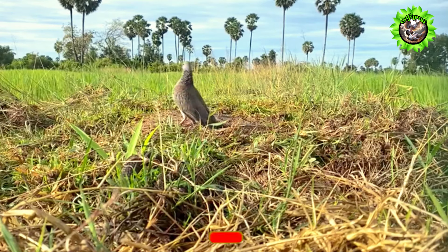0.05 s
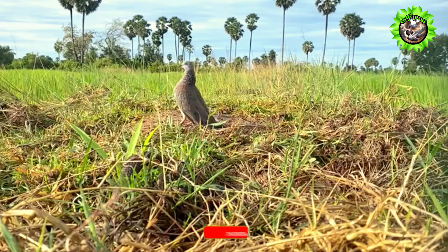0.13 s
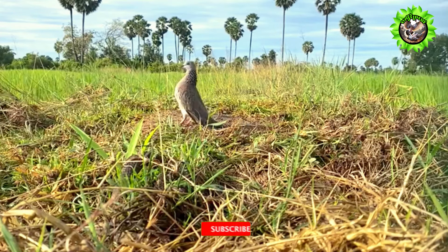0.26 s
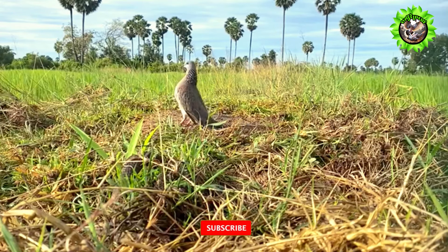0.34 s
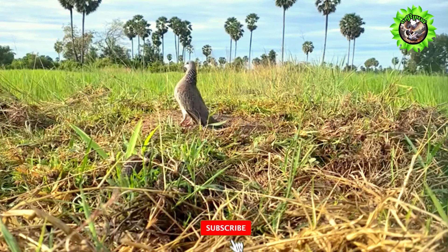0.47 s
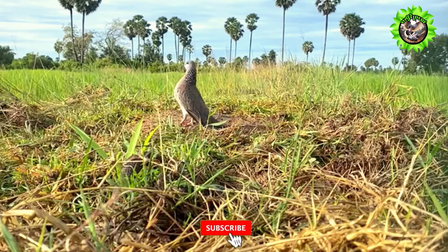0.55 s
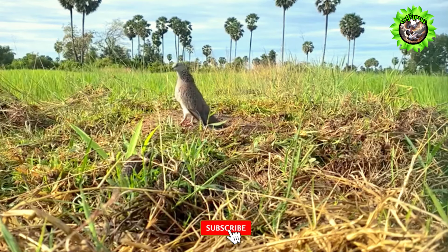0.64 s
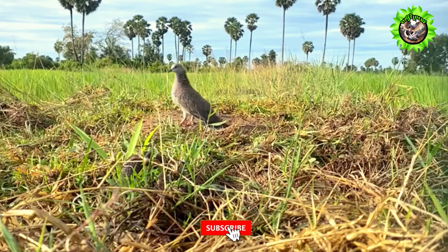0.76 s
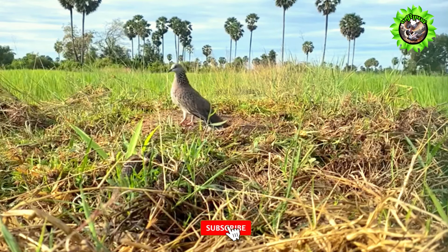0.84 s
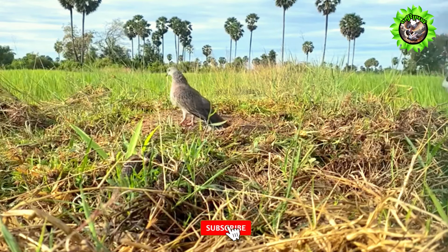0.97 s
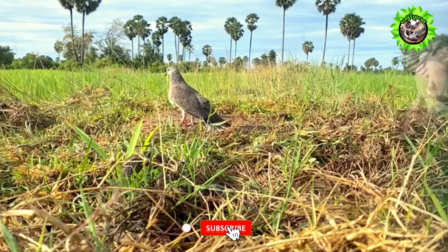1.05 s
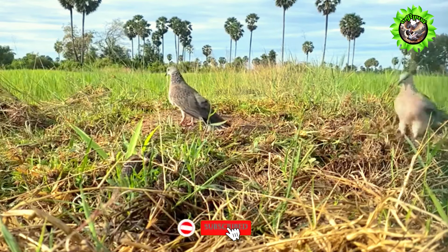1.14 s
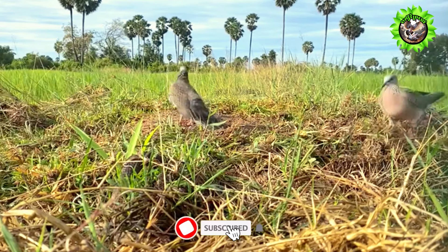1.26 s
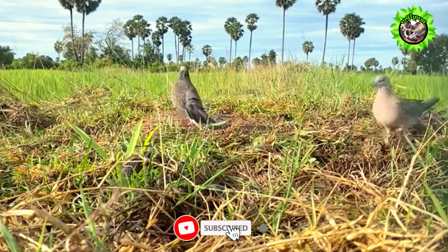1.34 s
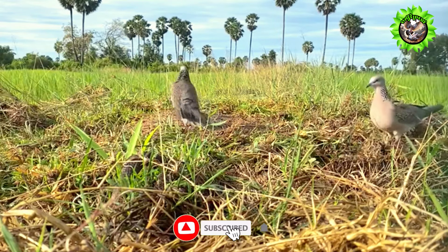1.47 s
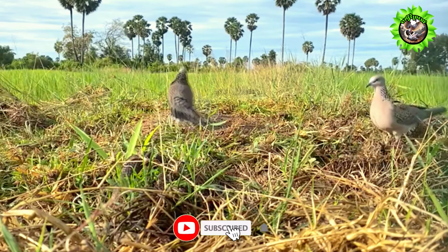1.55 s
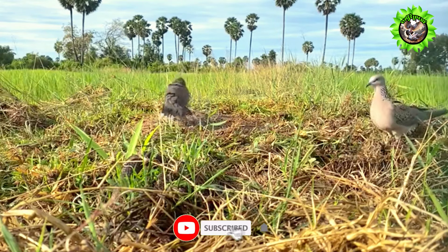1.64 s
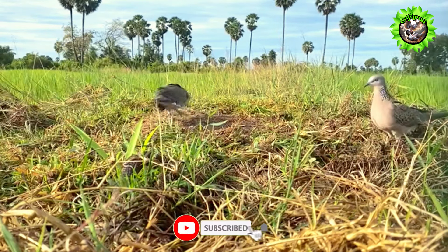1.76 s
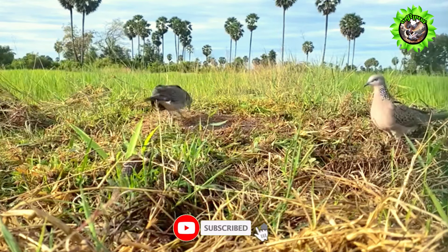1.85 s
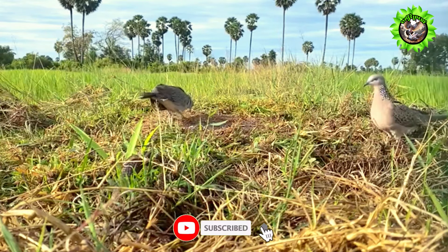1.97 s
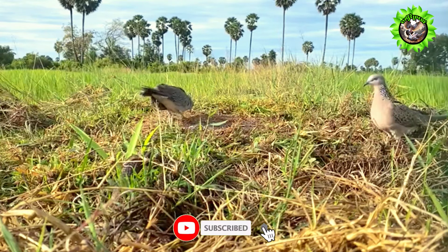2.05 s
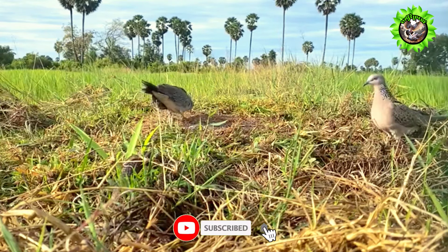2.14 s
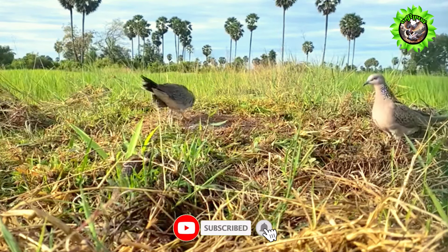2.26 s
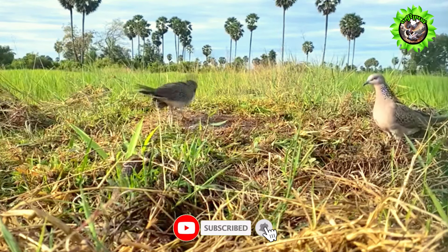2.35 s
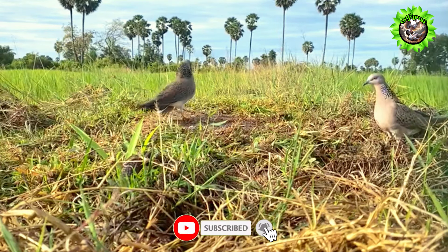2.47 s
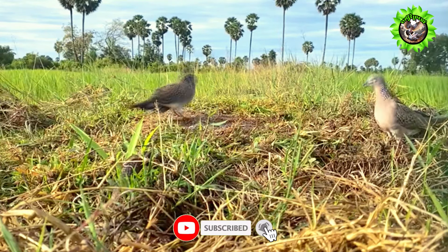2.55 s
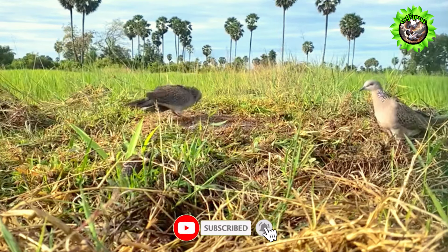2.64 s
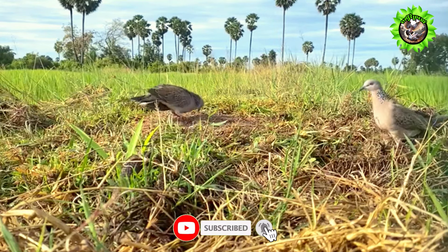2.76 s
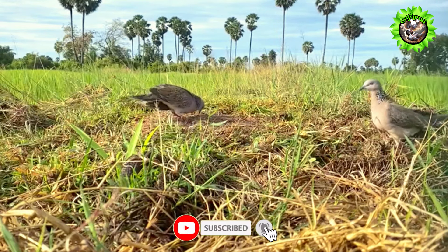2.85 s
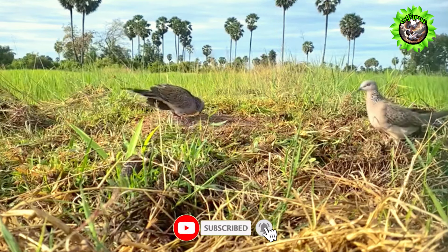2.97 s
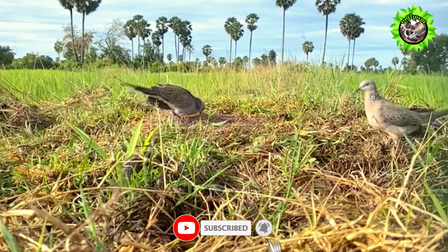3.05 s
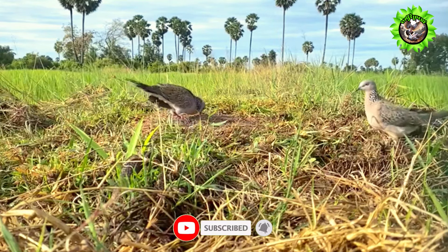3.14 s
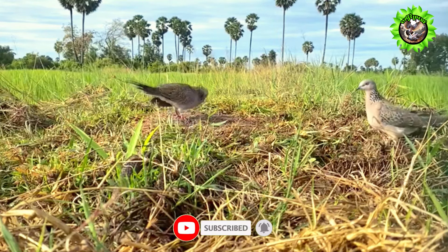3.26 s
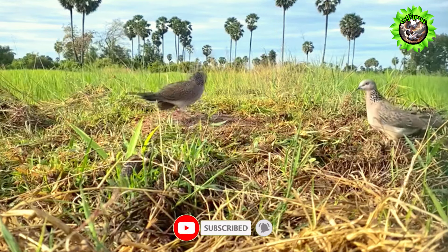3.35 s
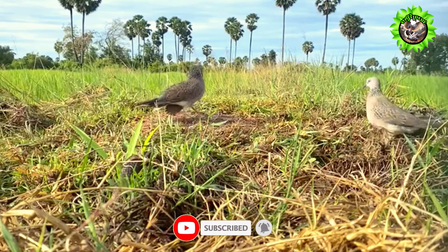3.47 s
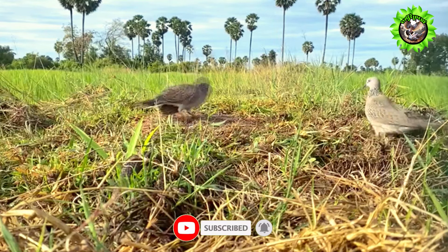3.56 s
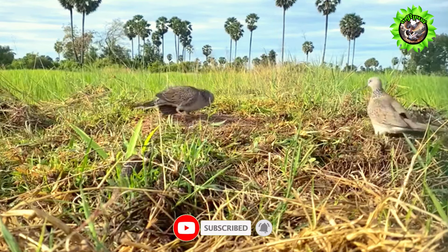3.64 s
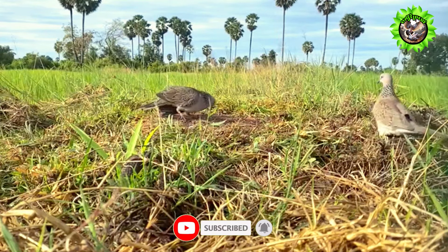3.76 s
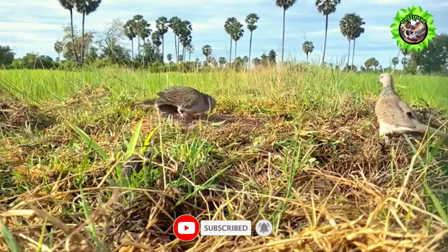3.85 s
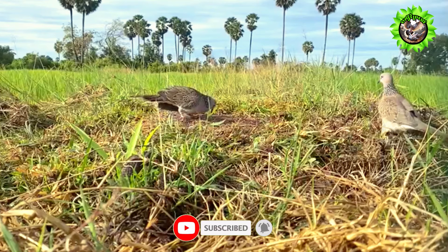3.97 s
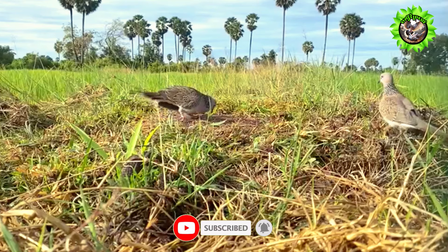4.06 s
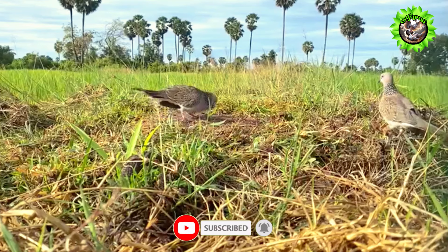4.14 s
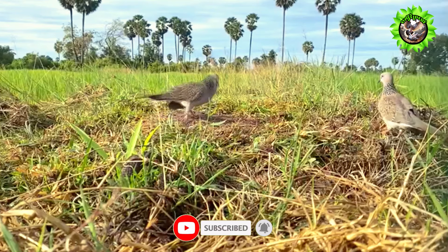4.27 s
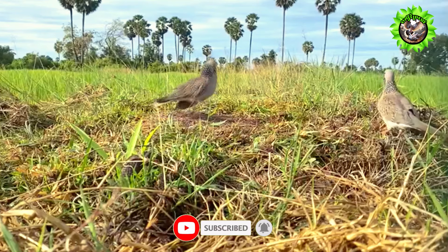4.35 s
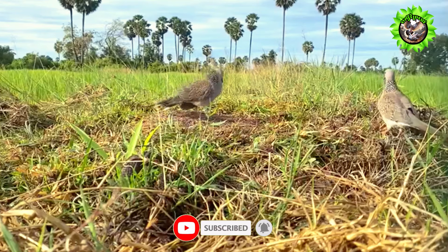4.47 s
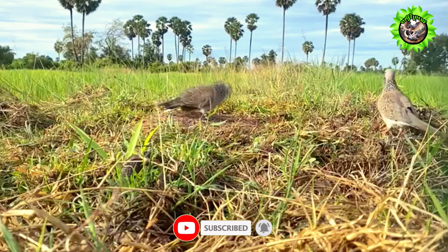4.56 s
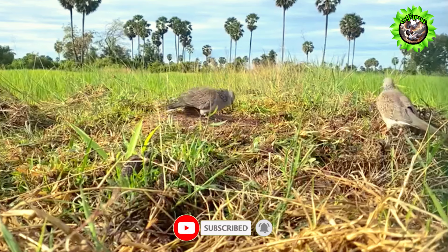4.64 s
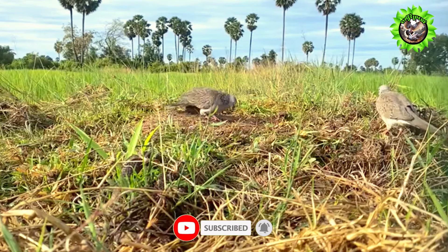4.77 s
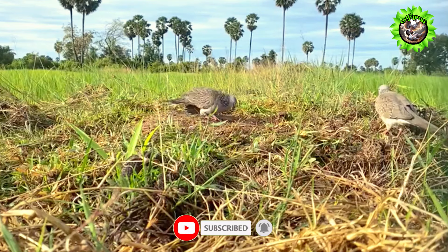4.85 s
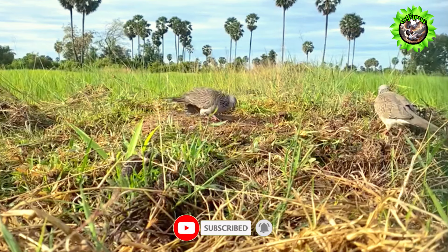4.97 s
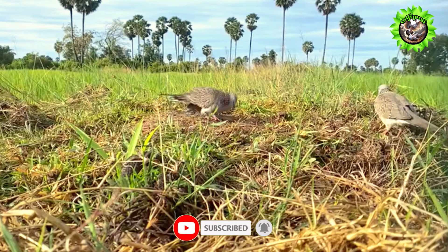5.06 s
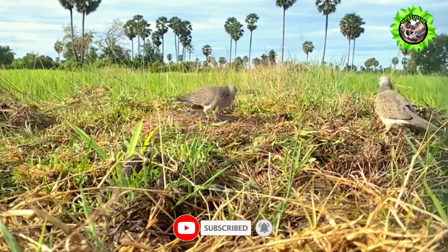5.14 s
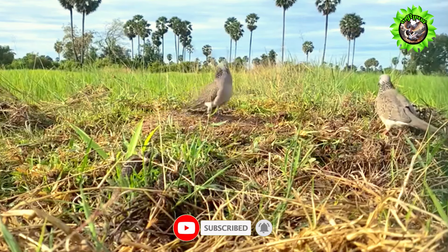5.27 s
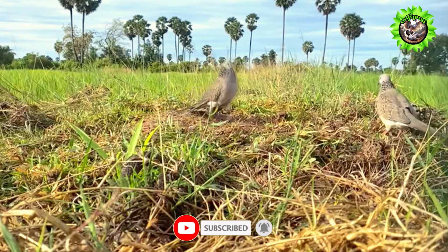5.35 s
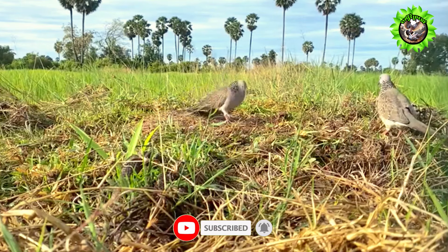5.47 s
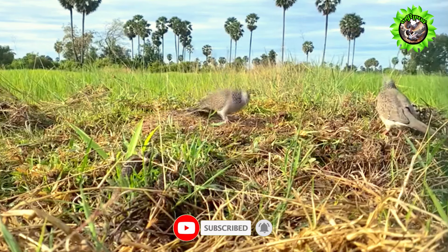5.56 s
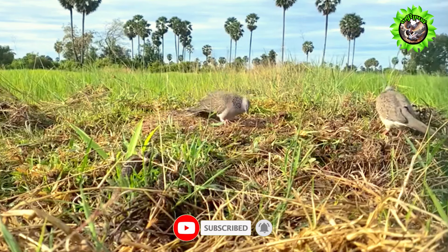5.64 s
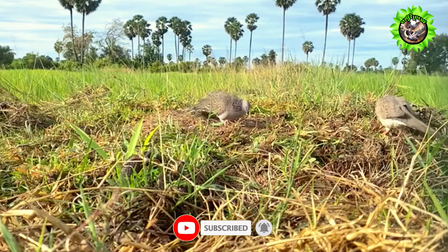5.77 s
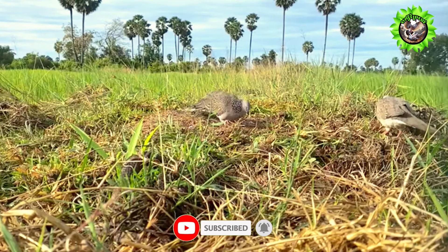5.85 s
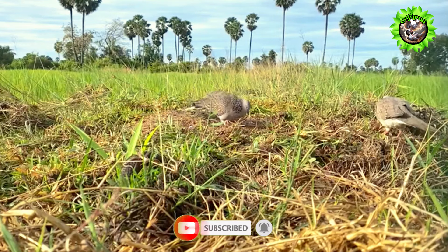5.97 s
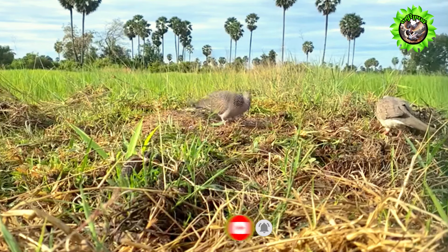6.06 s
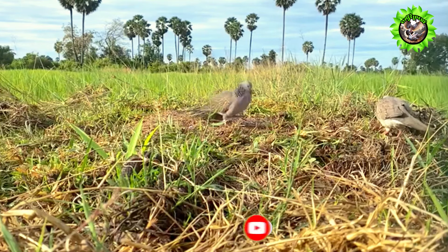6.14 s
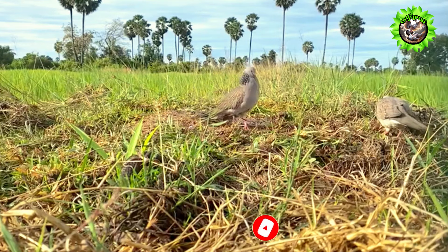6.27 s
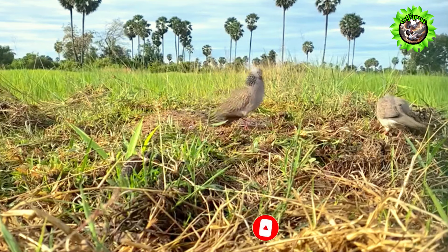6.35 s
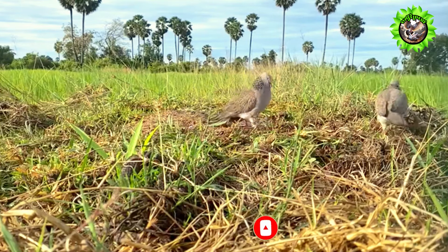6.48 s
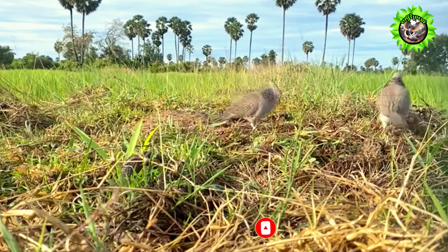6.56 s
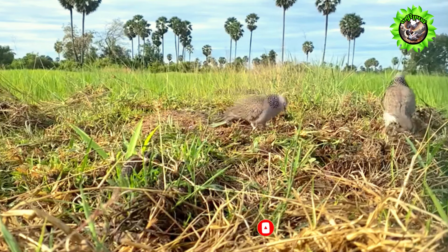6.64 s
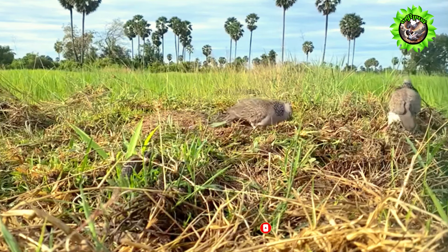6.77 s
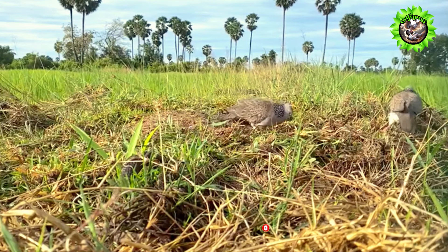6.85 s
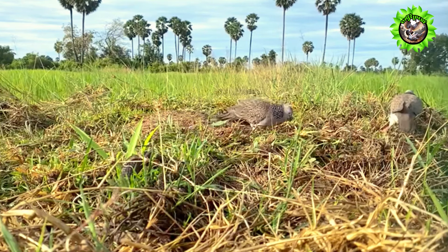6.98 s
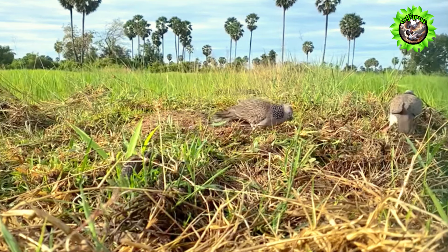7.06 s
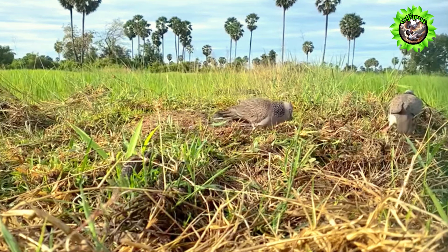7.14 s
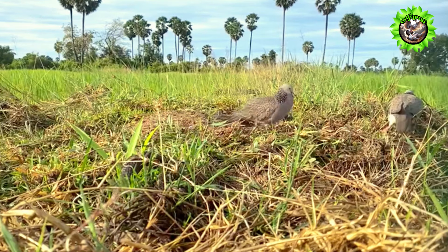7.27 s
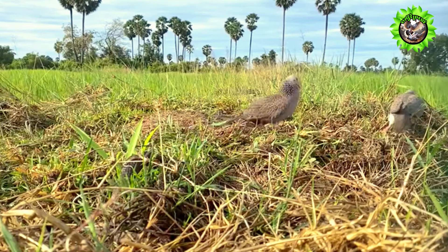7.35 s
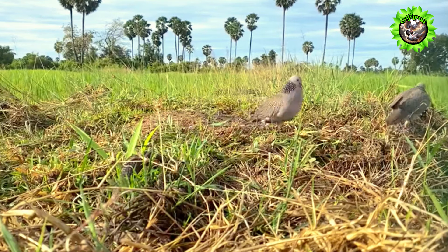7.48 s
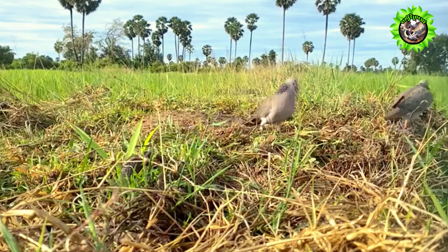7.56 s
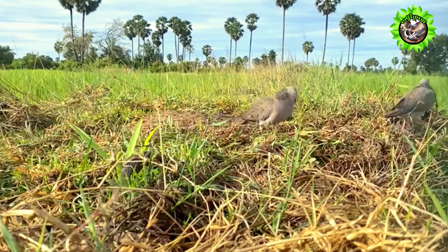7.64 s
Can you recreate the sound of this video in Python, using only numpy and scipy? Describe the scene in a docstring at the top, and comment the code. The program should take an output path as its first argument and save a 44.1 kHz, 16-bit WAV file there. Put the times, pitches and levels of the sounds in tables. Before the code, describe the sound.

Wings flap in with dry rustling, then a nearby dove repeats purring two-note coos; faint high whistles, an insect trill and a farther, rougher dove join.

```python
"""A dove close by coos in pairs, a short purred note and a long one that clears and drops; another answers farther off.
Each coo is a nearly pure tone made to throb by a slower flutter. Small birds whistle in gliding pure tones,
an insect trills in rapid strokes, and a dove flies in with claps and swishes of noise.
Short noise bursts tick, two of them like a faint chirp; dry stalks rustle in noise and crackles,
and shaped noise makes the wind and the rumble under the open field."""
import sys
import numpy as np
from scipy import signal
from scipy.fft import rfft, irfft
from scipy.io import wavfile
from scipy.ndimage import uniform_filter1d

SR = 44100
rng = np.random.default_rng(int(sys.argv[2]) if len(sys.argv) > 2 else 0)


def int16_out(signal):
    """Quantize to a 16-bit WAV file."""
    q = np.round(np.clip(np.atleast_2d(signal).T, -1, 1) * 32767)
    wavfile.write(sys.argv[1], SR, q.astype(np.int16))


N = 340011   # length of the scene in samples


def from_db(db):
    """Decibels to gain."""
    return 10 ** (np.asarray(db) / 20)


def rms_one(x):
    """Scale to rms 1."""
    return x / np.sqrt(np.mean(x ** 2) + 1e-20)


def stretch(rows):
    """Sample indices from the first row's time to the last, and each other column read along them."""
    s, *columns = np.transpose(rows)
    at = np.arange(max(round(s[0] * SR), 0), min(round(s[-1] * SR), N))
    return at, [np.interp(at / SR, s, column) for column in columns]


def drift(rate_hz):
    """Random wandering of rms 1: noise sent twice through a simple low-pass."""
    r = np.exp(-2 * np.pi * rate_hz / SR)
    noise = rng.standard_normal(N + SR)
    return rms_one(signal.lfilter([1], [1, -2 * r, r * r], noise)[SR:])   # skip the filter's start


def turns(hz):
    """Phase in radians of a changing frequency."""
    return 2 * np.pi * np.cumsum(hz) / SR


def delayed(x, delay_s):
    """The same sound, later."""
    return np.r_[np.zeros(round(delay_s * SR)), x][:N]


def band(order, low_hz, high_hz, x):
    """Keep only the sound between two pitches."""
    return signal.sosfilt(signal.butter(order, [low_hz, high_hz], "band", fs=SR, output="sos"), x)


def coloured(spectrum, flicker_db, flicker_hz):
    """Noise whose level flickers, shaped by a table of pitch and level; rms 1."""
    hz, level_db = np.transpose(spectrum)
    grid = np.maximum(np.arange(N // 2 + 1) * SR / N, 1)
    shape = from_db(np.interp(np.log(grid), np.log(hz), level_db, left=-90, right=-90))
    noise = rng.standard_normal(N) * from_db(flicker_db * drift(flicker_hz))
    return rms_one(irfft(rfft(noise) * shape, N))


def burst(s, db, rise_s, low_hz, high_hz):
    """A puff of noise that rises and dies away, then is narrowed to a band."""
    t = np.arange(round(12 * rise_s * SR) + 400) / SR / rise_s   # in rise times
    puff = from_db(db) * rng.standard_normal(len(t)) * t * np.exp(1 - t)
    out, first = np.zeros(N), round(s * SR)
    out[first:][:len(t)] = band(3, low_hz, high_hz, puff)[:N - first]
    return out


ATTACK_S, RELEASE_S = 0.026, .014   # soft start and end of every coo
LEAD_S, LEAD_DB = .012, -17   # the throat catches faintly before a near note
SWING = 1.4   # the membranes' swing saturates here
THROB_LEAN = 1.2   # radians that the outer side tones lag: each throb slides upward
OPEN_HZ = 665   # whole overtones fade out as the pitch sinks to here
LOW_LEAK_DB, LOW_LEAK_HZ = 9, 630   # extra octave in the low closing tone, below this pitch


def dove(coos, purr_hz, leaks_db, overtones, unsteady, rattle, hoarse, lead_s, alternate):
    """A near sine from the closed throat; a slower flutter of the membranes adds side tones, the lower strongest."""
    out = np.zeros(N)
    wobble, patchy, sway = drift(40), drift(11), drift(30)
    leak_wander = from_db(2.5 * np.minimum(drift(5), 1))
    skid, slip = drift(40), .6 + drift(8)
    # the inflated crop passes little above or below the note
    throat = np.vstack([signal.butter(7, 880, fs=SR, output="sos"),
                        signal.butter(4, 440, "high", fs=SR, output="sos")])
    smooth = signal.butter(6, 140, fs=SR, output="sos")
    noise = (rms_one(signal.sosfilt(smooth, rng.standard_normal(N)))
             + 1j * rms_one(signal.sosfilt(smooth, rng.standard_normal(N))))
    for rows, rate_hz, leak_db in zip(coos, purr_hz, leaks_db):
        rows = np.array(rows)
        rows[:, 2] = from_db(rows[:, 2]) ** 2   # sound power moves in straight lines
        at, (hz, power, purr) = stretch(rows)
        since, left = at / SR - rows[0, 0], rows[-1, 0] - at / SR

        full_voice = np.sin(np.pi / 2 * np.clip((since - lead_s) / ATTACK_S, 0, 1)) ** 2
        faint_catch = from_db(LEAD_DB) * np.clip(since / 0.013, 0, 1)
        release = np.sin(np.pi / 2 * np.clip(left / RELEASE_S, 0, 1)) ** 2
        gain = np.sqrt(power) * np.maximum(full_voice, faint_catch) * release

        catch = purr * np.clip(1 + .45 * patchy[at], .1, 1.5)   # the flutter catches and slips
        flutter_phase = turns(rate_hz * (1 + unsteady * wobble[at]))
        half = np.exp(.5j * flutter_phase + 1j * rng.uniform(0, 2 * np.pi))   # half the throb rate
        flutter = half ** 2
        outer = (.2 * flutter + .3 / flutter ** 2) * np.exp(-1j * THROB_LEAN)
        beat = 1 + catch * (1.0 / flutter + outer) + rattle * purr * noise[at]
        # strong and weak throbs take turns
        beat += alternate * catch * np.clip(slip[at], 0, 2) * (half + 1 / half - 1 / half ** 3)
        # make up for the power that the purr adds
        beat /= np.sqrt(1 + (1.13 + 3 * alternate ** 2) * catch ** 2 + 2 * (rattle * purr) ** 2)
        beat *= np.tanh(np.abs(beat) / SWING) / np.tanh(1 / SWING) / (np.abs(beat) + 1e-9)

        # the pitch skids from throb to throb
        unsteady_pitch = 1 + .002 * sway[at] + .15 * unsteady * purr * skid[at]
        phase = turns(uniform_filter1d(hz, size=300) * unsteady_pitch)
        tone = signal.sosfilt(throat, np.imag(beat * np.exp(1j * phase)))

        closing = np.clip((LOW_LEAK_HZ - hz) / 30, 0, 1) * (at > at.mean())
        opened = np.clip((hz - OPEN_HZ) / 35, 0, 1)
        for multiple, level_db in overtones:   # they leak out unevenly and blur in the purr
            blur = (hoarse + .7 * purr) * drift(23)[at]
            if multiple % 1:   # part of a breathy band
                strength = from_db(leak_db + 3.0 * drift(25)[at]) * np.clip((since - .05) / .03, 0, 1)
                strength = strength * (power.max() / power) ** 0.25
            else:
                strength = np.maximum(opened * (1 - .7 * purr), closing * (multiple == 2))
            if multiple == 2:
                level_db = level_db + leak_db + closing * (LOW_LEAK_DB - leak_db)
            overtone = np.abs(beat) * np.sin(multiple * phase + blur)
            tone += from_db(level_db) * leak_wander[at] * strength * overtone
        out[at] += np.sqrt(2) * gain * tone
    return out


SCOOP_FROM_HZ, SCOOP_S, SCOOP_DB = 490, .045, -1.5   # near notes slide up from a soft low start
ONSET_S, ONSET_SHARE = .026, 0.62   # full level comes this soon, at this share of the slide


def scoop(s, slide_s, top_hz, db, purr, onset_purr):
    """The slide up that opens a near note: rows of (s, Hz, dB, purr)."""
    onset_hz = SCOOP_FROM_HZ + ONSET_SHARE * (top_hz - SCOOP_FROM_HZ)
    return [(s - LEAD_S, SCOOP_FROM_HZ, db + SCOOP_DB, onset_purr),
            (s, SCOOP_FROM_HZ, db + SCOOP_DB, onset_purr),
            (s + ONSET_S, onset_hz, db, onset_purr),
            (s + slide_s, top_hz, db, purr)]


ONSET_PURR = 0.02   # share of the purr at the start of a short note
SHORT_SAG, SHORT_END = .975, 0.739   # shares of the top pitch: before the fall, at the end
SHORT_FALL_S, LAST_PUSH_DB = 0.0363, 2   # it clears and falls off with a last push


def short_coo(s, length_s, top_hz, db, purr):
    """Scoop up, purr, sag a little, then clear and fall off."""
    end, pushed_db = s + length_s, db + LAST_PUSH_DB
    return scoop(s, SCOOP_S, top_hz, db, purr, ONSET_PURR * purr) + [
        (end - SHORT_FALL_S, SHORT_SAG * top_hz, db, purr),
        (end - SHORT_FALL_S / 2, (SHORT_SAG + SHORT_END) / 2 * top_hz, pushed_db, 0.42 * purr),
        (end, SHORT_END * top_hz, pushed_db, 0)]


PURR_LIFT, PURR_DB, CLEARING_S = 1.065, -3.5, .035   # the purred part lies higher and softer
SLIDE_SHARE = .42   # a long purr slides up for this share of its length
LONG_ONSET_PURR, LATE_PURR, LATE_LIFT = .65, .55, 1.02   # a rough start; the purr thins and sinks
SAG_HZ, SAG_S = 103.07, 0.15   # the clear tone sags ever faster: scale of the sag, time constant
DROP_S, DROP_DB = .01, -2   # the break into the low tone; its level against that at clearing
TAIL_SAG_HZ_PER_S, TAIL_FADE_DB = 595, -14   # how the low tone sinks and fades


def long_coo(s, clears, drops, ends, sagged_hz, low_hz, db, swell_db, purr):
    """Scoop up, purr, clear, sag and swell, then break to a low fading tone."""
    u = np.linspace(0, 1, 10)   # from clearing to the drop
    t = clears + u * (drops - clears)
    hz = sagged_hz + SAG_HZ * (1 - np.exp((t - drops) / SAG_S))
    soft_db, low_db = db + PURR_DB, db + DROP_DB
    slide_s = max(SCOOP_S, SLIDE_SHARE * (clears - s))
    purr_ends = max(clears - CLEARING_S, s + slide_s + .001)
    opening = scoop(s, slide_s, PURR_LIFT * hz[0], soft_db, purr, LONG_ONSET_PURR)
    late_purr = [(purr_ends, LATE_LIFT * hz[0], soft_db, LATE_PURR * purr)]
    clear = list(zip(t, hz, db + swell_db * u ** 2, .03 + 0 * u))
    tail_hz = low_hz - TAIL_SAG_HZ_PER_S * (ends - drops)
    low = [(drops + DROP_S, low_hz, low_db, .03), (ends, tail_hz, low_db + TAIL_FADE_DB, .03)]
    return opening + late_purr + clear + low


SHORT_PURR_HZ, LONG_PURR_HZ = 105.3, 125.3   # throbs a second
# Overtones of the near dove. Each row: multiple of the pitch, level in dB before the leak is added.
NEAR_OVERTONES = [(2, -49), (3, -56)]
# Short purred notes. Each row: start in seconds, length in seconds, top pitch in Hz, level in dB,
# purr from 0 to 1, octave leak in dB.
SHORT_COOS = [(1.609, 0.15, 784, -19, 1, 16.5), (2.538, 0.16, 782, -20, 1, -1),
              (3.489, 0.16, 767, -19.5, 1, -12), (4.432, 0.16, 750, -19.5, 0.94, 15),
              (5.4, 0.1652, 738.6, -19, 0.85, 11.5), (6.5, .17, 740, -19, 0.85, -13),
              (7.605, 0.13, 709.5, -17, 1, 12)]
# Long notes. Each row: start, clearing, drop and end (all in seconds), pitch in Hz before the drop and after it,
# level in dB as it clears, swell in dB up to the drop, purr from 0 to 1, octave leak in dB.
LONG_COOS = [(1.897, 2.09, 2.202, 2.302, 707, 616, -14, 1, .85, 5),
             (2.815, 3.02, 3.164, 3.258, 682, 590, -15.5, 1, .95, -25),
             (3.763, 3.97, 4.118, 4.19, 673, 560, -15, 0, .9, -25),
             (4.7, 4.83, 5.048, 5.126, 647, 552, -16, 1.5, .5, 6),
             (5.664, 5.745, 6.024, 6.088, 641, 548, -16.5, 3, .35, 5),
             (6.779, 6.84, 7.134, 7.208, 625, 548, -16, 4.5, .2, -4)]


def near_dove():
    """The close dove: its long notes flutter faster and more roughly than its short ones."""
    short = dove([short_coo(*row[:-1]) for row in SHORT_COOS], [SHORT_PURR_HZ] * len(SHORT_COOS),
                 [row[-1] for row in SHORT_COOS], NEAR_OVERTONES,
                 unsteady=.07, rattle=.25, hoarse=.1, lead_s=LEAD_S, alternate=.22)
    long = dove([long_coo(*row[:-1]) for row in LONG_COOS], [LONG_PURR_HZ] * len(LONG_COOS),
                [row[-1] for row in LONG_COOS], NEAR_OVERTONES,
                unsteady=.11, rattle=.36, hoarse=.2, lead_s=LEAD_S, alternate=.33)
    return short + long


# Note shapes of the far dove. Each row: share of the length, share of the top pitch,
# level in dB against the note's own, purr from 0 to 1.
FAR_SHAPES = { "arch": [(0, 0.85, -12, 0.25), (.12, .89, -2, 0.28), (.27, 0.94, -0.5, 0.41),
              (.45, 0.97, -1, 0.27), (.56, 0.95, -1, 0.27), (.72, .9, -5, .2), (.87, .8, -9, 0.15),
              (1, .73, -17.5, 0.56)], "level": [(0, 0.85, -6, 0.46), (.12, .88, -4, 0.23),
              (.22, 1, 1.5, 0.24), (.45, 1, -9, 0.36), (.82, 1.0, -4, .3), (1, .8, -3, 0.081)], }


def far_coo(s, length_s, top_hz, level_db, shape):
    """A note of the named shape at its time, length, pitch and level."""
    return [(s + share * length_s, pitch * top_hz, level_db + db, purr)
            for share, pitch, db, purr in FAR_SHAPES[shape]]


# Overtones that form a breathy band. Each row: multiple of the pitch, level in dB before the note's own is added.
FAR_OVERTONES = [(1.4, -33), (1.55, -34), (1.7, -35), (1.82, -36), (1.93, -30), (2.8, -48), (3.05, -47)]
# Far coos. Each row: start in seconds, length in seconds, top pitch in Hz, level in dB,
# throbs a second, shape, breathy band in dB.
FAR_COOS = [(5.661, .16, 686.5, -19, 70, "arch", -9), (5.958, 0.505, 653.8, -21.5, 45, "arch", -3),
            (6.76, .18, 630, -19, 70, "level", -12.5), (7.077, 0.48, 660.6, -21, 60, "arch", -4)]


def far_dove():
    """The answering dove, rougher and breathier; turned away, it is duller."""
    coos = dove([far_coo(*row[:4], row[5]) for row in FAR_COOS], [row[4] for row in FAR_COOS],
                [row[6] for row in FAR_COOS], FAR_OVERTONES,
                unsteady=.15, rattle=.8, hoarse=.75, lead_s=0, alternate=.15)
    return signal.sosfilt(signal.butter(2, 1500, fs=SR, output="sos"), coos)


BLUR_FROM_DB = -48   # notes softer than this come from far off
OCTAVE_DB = -39.5   # the whistle's octave, heard as the pitch falls
# Whistled notes. Each row: start in seconds, length in seconds, pitch factor, level in dB, shape.
WHISTLES = [(-.04, 0.35, 0.99, -44.5, "long"), (0.363, 0.19, 0.99, -48, "fall"),
            (0.572, 0.096, 1.0, -56, "arch"), (0.717, 0.35, 1, -46, "long"),
            (1.11, 0.22, 0.98, -51, "fall"), (1.326, 0.1, 0.98, -49.5, "arch"),
            (1.468, 0.36, 0.98, -42, "long"), (1.876, 0.22, 0.97, -46.5, "fall"),
            (2.088, 0.1, 0.97, -45, "arch"), (2.235, 0.34, 0.99, -47, "long"),
            (2.652, 0.22, 0.96, -55, "fall"), (2.87, 0.095, 0.97, -47, "arch"),
            (3.007, 0.36, 1.013, -46, "long"), (3.458, 0.2, 0.96, -56, "fall"),
            (3.678, 0.085, 1.0, -57, "arch"), (4.054, 0.077, 1, -68, "peep"),
            (4.818, 0.042, 0.94, -67.5, "peep"), (4.94, 0.14, 0.97, -56, "dome"),
            (5.186, 0.049, 1.8, -62.5, "peep"), (5.312, 0.14, 0.98, -53, "climb"),
            (5.501, 0.14, 0.96, -57, "drop"), (5.708, 0.15, 0.98, -54, "climb"),
            (5.762, 0.072, 1.06, -60, "peep"), (5.889, 0.16, 0.975, -54, "drop"),
            (6.104, 0.16, 0.96, -60, "climb"), (6.977, 0.089, 0.91, -63.5, "peep")]
# Shapes of those notes. Each row: share of the length, pitch in Hz before the factor,
# level in dB against the note's own.
NOTE_SHAPES = { "long": [(0, 5500, -12), (.03, 6750, -5), (.12, 6880, -5), (.45, 7040, -2), (.62, 6850, -3),
               (.72, 6300, -4), (.84, 5300, -7), (.93, 4950, -11), (1, 4150, -17)],
               "fall": [(0, 5800, -4.5), (.09, 6570, -6), (.2, 7040, 2.5), (.3, 6500, -3), (.47, 5360, 0),
               (.7, 4500, -12.5), (1, 4000, -21)], "arch": [(0, 4420, -17), (.13, 5800, -3.5),
               (.33, 6670, -8), (.68, 6900, 1), (.88, 6800, -2.5), (1, 5400, -16.5)],
               "dome": [(0, 5370, -12.5), (.2, 6420, 6), (.5, 6700, 0), (.8, 6300, 1.5), (1, 5670, -15.5)],
               "climb": [(0, 5620, -1.5), (.35, 6240, -3), (.62, 7020, -3), (.8, 6700, -4.5),
               (1, 5500, -4)], "drop": [(0, 7220, -6), (.2, 7360, -1), (.6, 7300, 0), (.8, 6700, -8),
               (1, 5700, -13)], "peep": [(0, 4150, -14.5), (.3, 3870, 6.5), (1, 3200, -4.5)], }
# Faint copies at fixed steps above each whistle, not part of the birds' voice, fading as it falls.
# Each row: step above in Hz, level in dB.
FAINT_COPIES = [(3900, -28), (7830, -43)]
# Reflections off stems and water. Each row: delay in seconds, level in dB.
NEAR_GROUND = [(.009, -10.5), (0.015, -12), (.028, -18)]


def whistles():
    """Near sines with a slight tremble, a weak octave and close, wavering reflections; faint copies lie above."""
    out, tremble = np.zeros(N), from_db(2.0 * drift(43))
    blur = 0.8 * drift(120)   # the faint, far notes arrive smeared
    for start_s, length_s, factor, note_db, shape in WHISTLES:
        at, (hz, level_db) = stretch([(start_s + share * length_s, factor * shape_hz, note_db + db)
                                      for share, shape_hz, db in NOTE_SHAPES[shape]])
        hz = uniform_filter1d(hz, size=350)   # the glide is rounded
        phase = turns(hz)
        tone = np.sin(phase + blur[at] * np.clip((BLUR_FROM_DB - note_db) / 12, 0, 1))
        tone += from_db(OCTAVE_DB) * np.clip((6200 - hz) / 300, 0, 1) * np.sin(2 * phase)
        copies = sum(from_db(db) * np.sin(turns(hz + above_hz)) for above_hz, db in FAINT_COPIES)
        tone += np.clip((hz - 5200) / 1300, 0, 1) * copies
        soft_ends = signal.windows.tukey(len(at), .12)
        out[at] += np.sqrt(2) * from_db(level_db) * tremble[at] * tone * soft_ends
    return out + sum(from_db(db) * delayed(out, s) * drift(32) for s, db in NEAR_GROUND)


# Echoes off the bank and trees. Each row: delay in seconds, level in dB.
ECHOES = [(.031, -27), (.057, -33), (.083, -34), (.12, -36)]


def field_echo(x):
    """A few dull returns that waver in strength."""
    dull = signal.sosfilt(signal.butter(1, 4500, fs=SR, output="sos"), x)
    return sum(from_db(db) * delayed(dull, s) * drift(31) for s, db in ECHOES)


STROKES_PER_S = 27   # on average
# The trill's course. Each row: time in seconds, pitch in Hz, level in dB before the strokes shape it.
INSECT = [(3.3, 7520, -66), (3.6, 7530, -59.5), (3.75, 6870, -69), (4.1, 7000, -60.5), (4.6, 7120, -61.5),
          (4.68, 6700, -55.5), (4.8, 6700, -58.5), (4.86, 7070, -62), (5.3, 7190, -76), (6.3, 6850, -78),
          (7.0, 6910, -69), (7.7, 6940, -68)]


def insect():
    """Short wing strokes, each a rough burst of one high pitch."""
    out = np.zeros(N)
    at, (hz, level_db) = stretch(INSECT)
    stroke_phase = turns(STROKES_PER_S * (1 + 0.092 * drift(2)[at]))
    strokes = np.maximum(np.cos(stroke_phase), 0) ** 3 + .12   # a little sounds on between strokes
    out[at] = 2 * from_db(level_db) * strokes * np.sin(turns(hz) + 1.0 * drift(160)[at])
    return out


UPSTROKE_S, UPSTROKE_DB, SWISH_S = 0.041, 0.5, 0.014   # the return stroke's delay and level; rise
CLAP_DB, CLAP_S = 3, 0.0022   # level against the swish; rise
# Wingbeats of a dove flying in. Each row: start in seconds, swish level in dB before the band filter.
WINGBEATS = [(.39, -58), (0.482, -53), (0.576, -47.5), (.666, -47.5), (0.76, -48), (0.851, -48),
             (.949, -52)]


def wings():
    """Downstroke and upstroke swish high; the downstroke opens with a clap of feathers."""
    out = np.zeros(N)
    for s, db in WINGBEATS:
        out += burst(s, db + CLAP_DB, CLAP_S, 1600, 10700)
        out += burst(s, db, SWISH_S, 8100, 10300)
        out += burst(s + UPSTROKE_S, db + UPSTROKE_DB, SWISH_S, 7800, 10900)
    return out


# Short noise bursts; the two near 3 kHz stand in for a faint rising chirp. Each row: start in seconds,
# peak level in dB before the band filter, centre in Hz, rise in seconds, width as a pitch ratio to either side.
SHORT_BURSTS = [(.085, -57, 5000, .004, 1.4), (1.07, -52, 8500, .012, 1.25), (3.44, -50, 2900, .012, 1.1),
                (3.48, -50, 3200, .01, 1.1), (3.57, -55, 8500, .002, 1.3)]


def short_bursts():
    """Soft bursts of noise, each around its own pitch; two in a row, the second higher, suggest a chirp."""
    return sum(burst(s, db, rise_s, hz / width, hz * width) for s, db, hz, rise_s, width in SHORT_BURSTS)


# Grass brushes. Each row: start in seconds, peak level in dB before the band filter, rise in seconds.
BRUSHES = [(2.58, -63, .03), (3.302, -57.5, 0.16), (4.25, -63, 0.053), (5.15, -63, 0.063),
           (6.121, -62, 0.05), (7.4, -62, 0.1)]


def brushes():
    """Grass brushes past in soft, high swells."""
    return sum(burst(s, db, rise_s, 7300, 10000) for s, db, rise_s in BRUSHES)


# Gusts, as the rustle of dry stalks. Each row: time in seconds, level in dB.
GUSTS = [(0, -66), (.35, -57.5), (.6, -52.5), (.95, -56.5), (1.1, -55.5), (1.3, -59), (1.5, -66),
         (2.5, -74.5), (3.2, -75), (3.5, -64.5), (3.75, -70.5), (5.9, -76), (6.25, -63), (6.8, -79.5),
         (7.71, -61.5)]


def gusts():
    """The gusts' level in dB at every sample, which drives both rustle and wind."""
    return np.interp(np.arange(N) / SR, *np.transpose(GUSTS))


CRACKS_PER_S, CRACK_DB = 1300, -11   # grain of the rustle: rate before clumping, level


def crackle():
    """Dense uneven cracks of dry straw, in clumps; rms 1."""
    born = rng.random(N) < CRACKS_PER_S * from_db(5 * drift(14)) / SR
    size = from_db(2.7 * np.minimum(rng.exponential(1, N), 4))
    return rms_one(band(10, 4000, 11000, born * size * rng.choice([-1, 1], N)))


# Colour of the rustle. Each row: pitch in Hz, relative level in dB per Hz.
RUSTLE = [(350, -45), (700, -5.5), (1500, -9.5), (3030, -20), (6000, -15.5), (8000, -16), (11500, -25.5),
          (11900, -40), (15500, -44)]


def rustle(gust_db):
    """Dry stalks: flickering noise with crackle, rising and falling with the gusts."""
    return from_db(gust_db) * (coloured(RUSTLE, flicker_db=2.5, flicker_hz=60) + from_db(CRACK_DB) * crackle())


WIND_DB, WIND_FOLLOWS = -39, 0.13   # level at mean gust, before easing; share of the gust's swing
WIND_FADE_DB_PER_S = 1.5   # it eases off slowly
# Colour of the wind. Each row: pitch in Hz, relative level in dB per Hz.
WIND = [(8.8, -41), (15, -16.5), (43, -3), (59, 8.5), (92, 2), (124, -4), (200, -9.5), (260, -49.5),
        (440, -120)]


def wind(gust_db):
    """Low flickering noise that follows the gusts a little and eases off."""
    wind_db = WIND_DB + WIND_FOLLOWS * (gust_db - gust_db.mean()) - WIND_FADE_DB_PER_S * np.arange(N) / SR
    return from_db(wind_db) * coloured(WIND, flicker_db=2.0, flicker_hz=3.8)


# Colour of the open field. Each row: pitch in Hz, relative level in dB per Hz.
FIELD = [(24, -32.5), (40, -7), (114, 0.5), (330, -10), (520, -17), (817, -23.5), (1310, -37.5),
         (1700, -34), (2300, -36), (5710, -35), (6900, -34), (7500, -43), (11300, -58.5), (12000, -76.5),
         (15500, -81)]


def field():
    """Distant rumble and faint hiss: gently flickering noise."""
    return from_db(-42) * coloured(FIELD, flicker_db=1.96, flicker_hz=16)


def scene():
    """Birds and their echoes over insect, wings, short bursts, grass, rustle, wind and field."""
    birds = near_dove() + far_dove() + whistles()
    gust_db = gusts()
    details = insect() + wings() + short_bursts() + brushes()
    background = rustle(gust_db) + wind(gust_db) + field()
    return (birds + field_echo(birds) + details + background)[None]


def record(dry):
    """The top is cut steeply; the last instant fades."""
    fade = np.clip((N - np.arange(N)) / (.004 * SR), 0, 1)
    return signal.sosfilt(signal.cheby2(24, 70, 15628, fs=SR, output="sos"), dry * fade)   # cut in Hz


dry = scene()
out = record(dry)
int16_out(out)
```